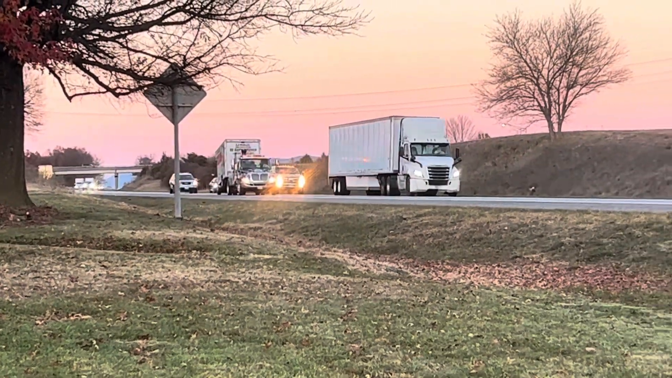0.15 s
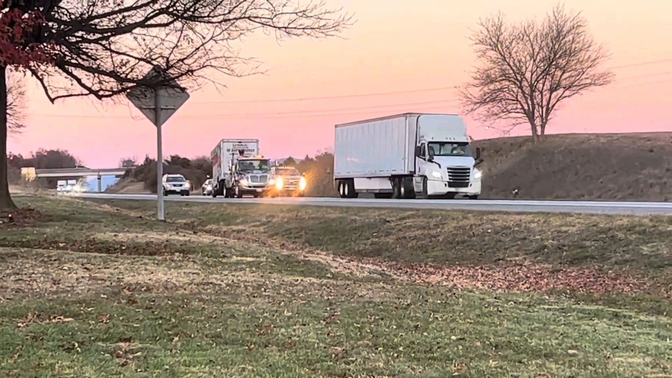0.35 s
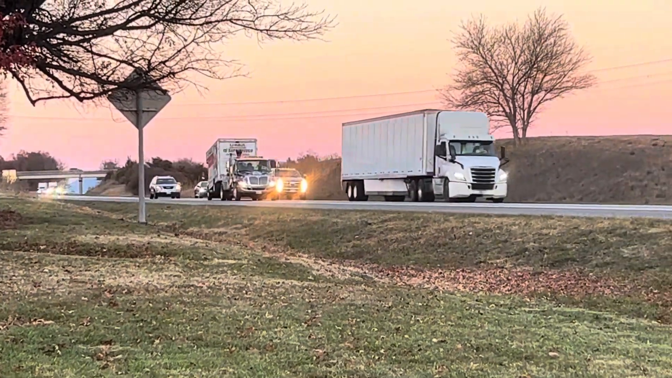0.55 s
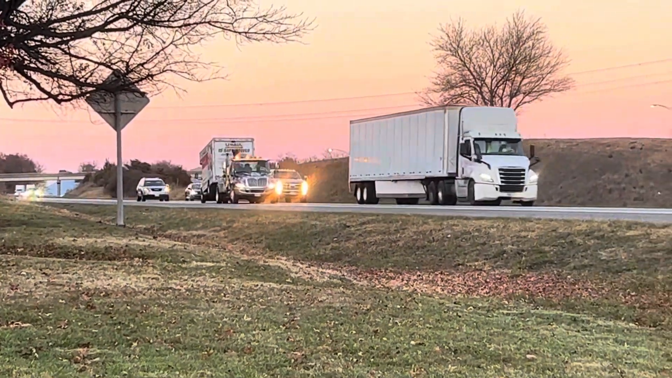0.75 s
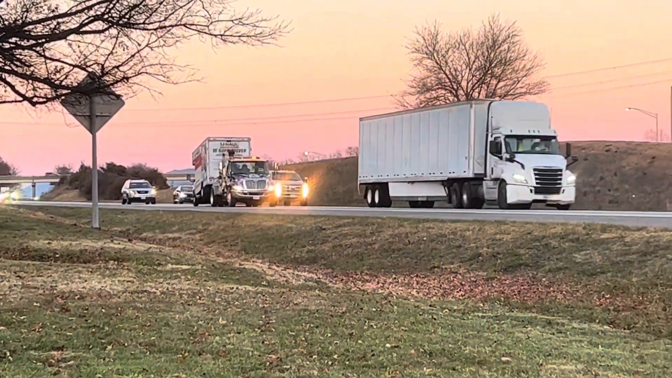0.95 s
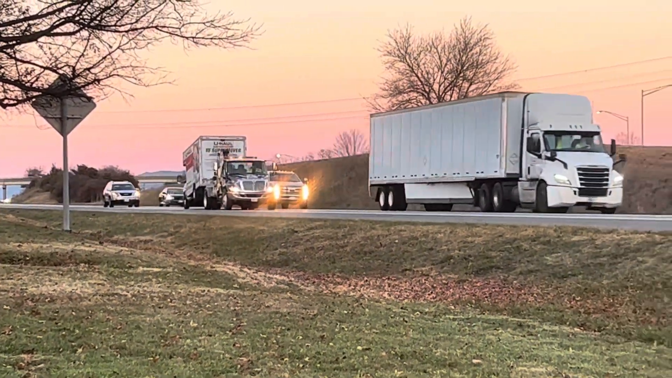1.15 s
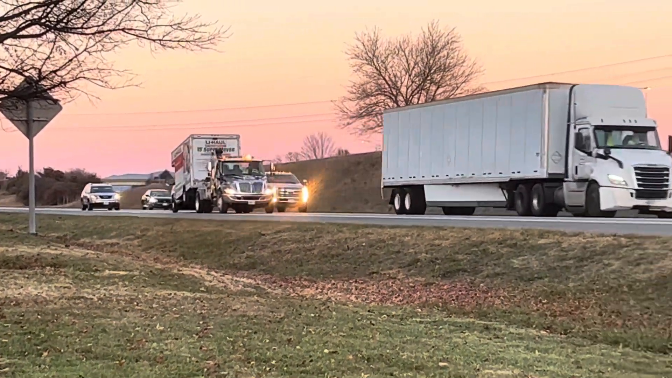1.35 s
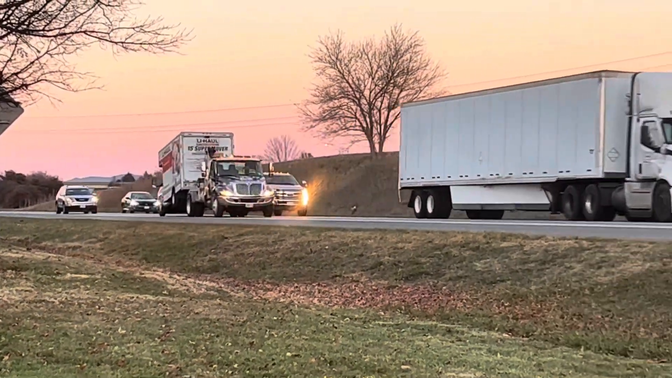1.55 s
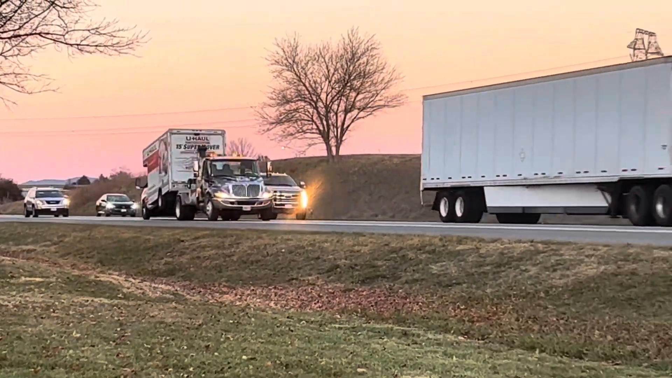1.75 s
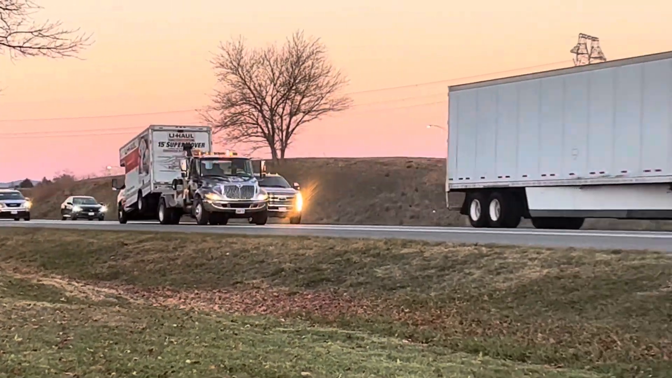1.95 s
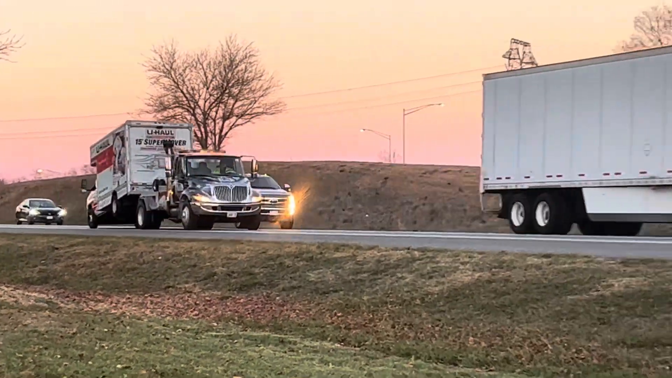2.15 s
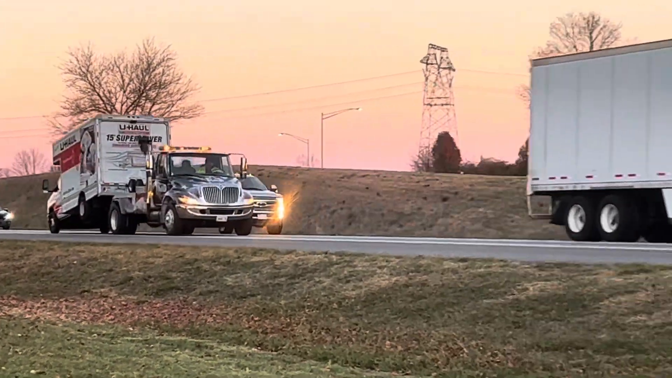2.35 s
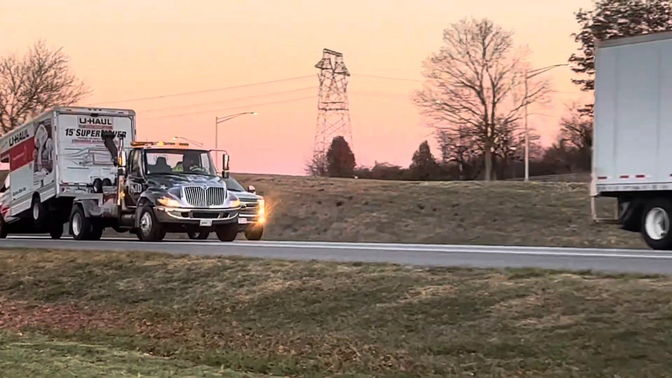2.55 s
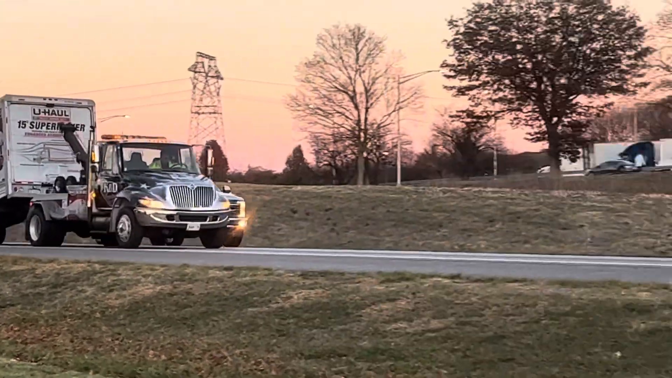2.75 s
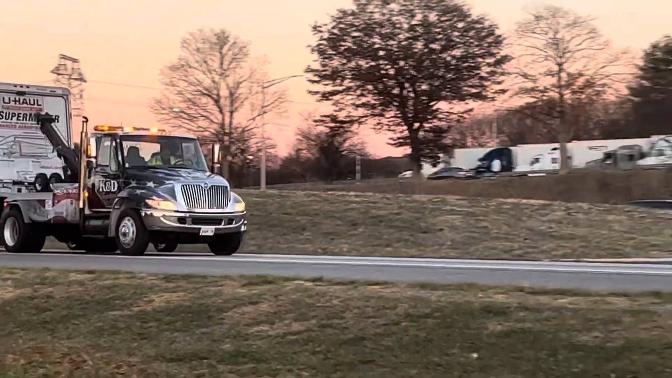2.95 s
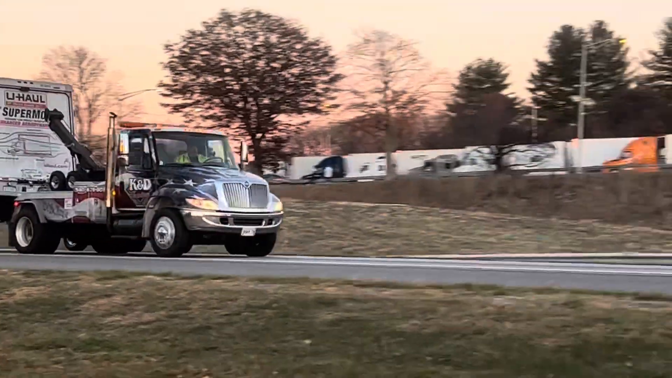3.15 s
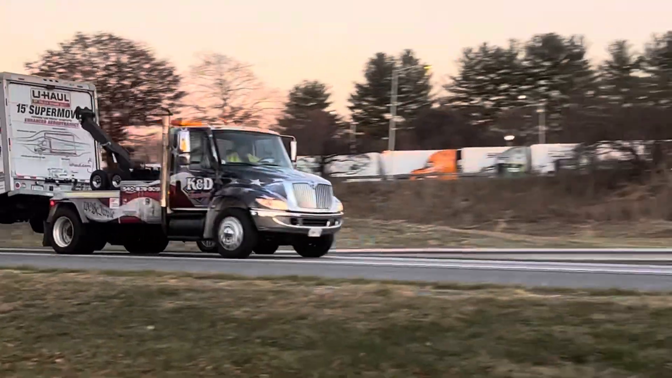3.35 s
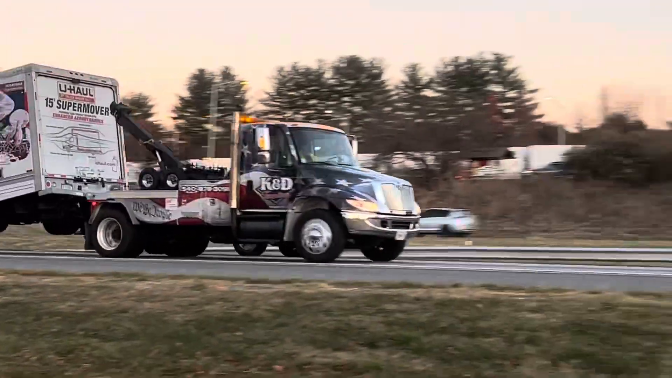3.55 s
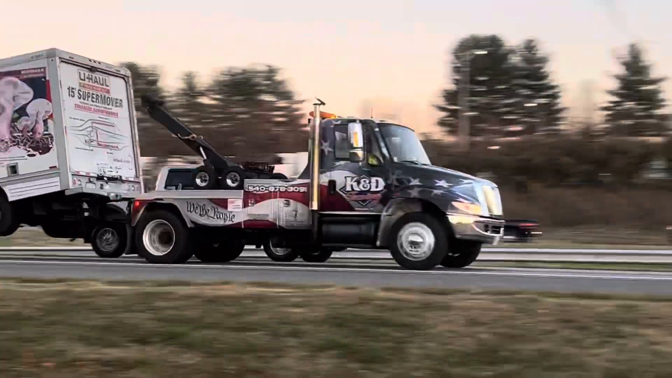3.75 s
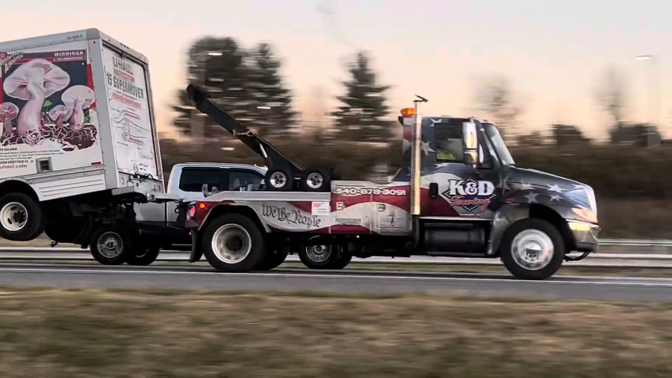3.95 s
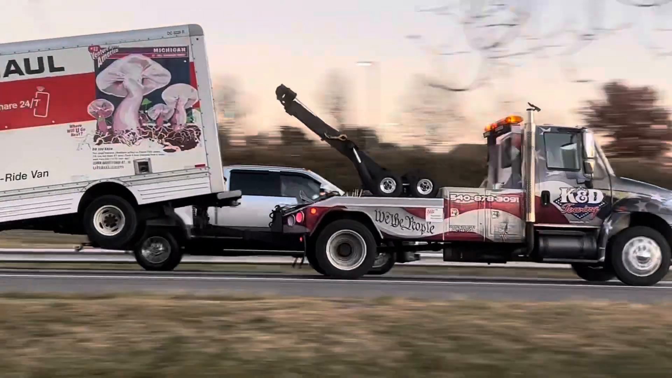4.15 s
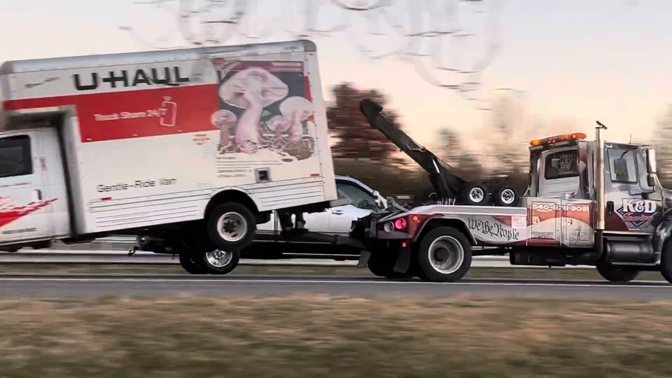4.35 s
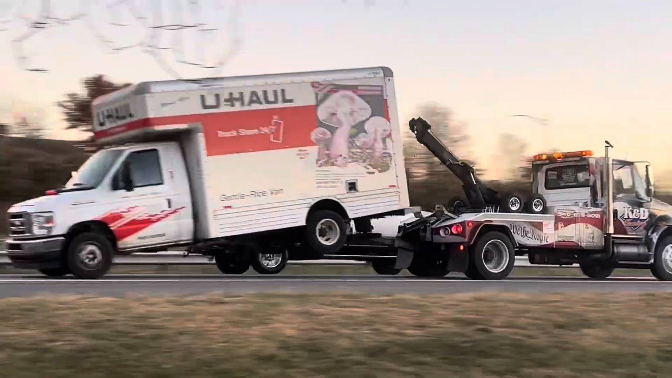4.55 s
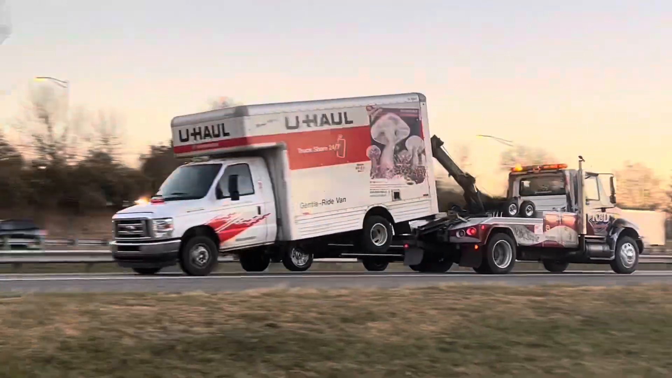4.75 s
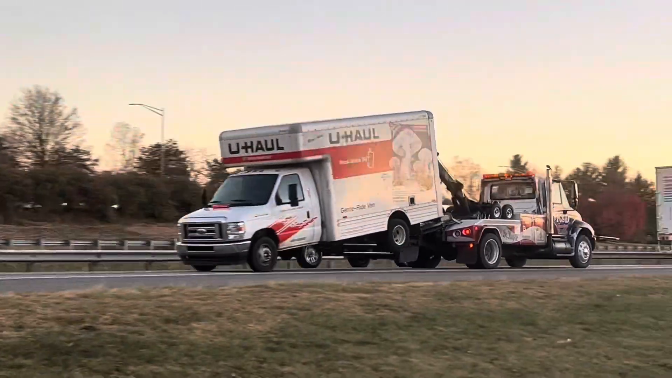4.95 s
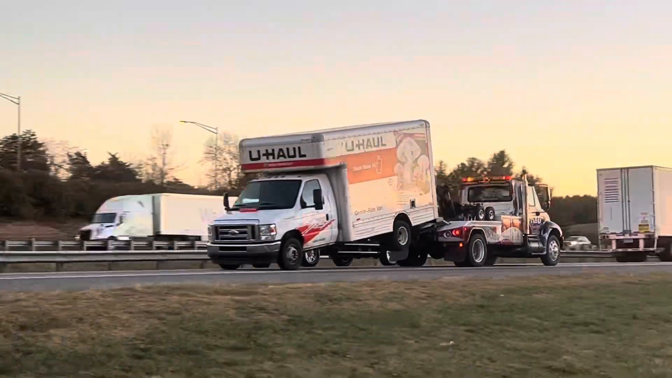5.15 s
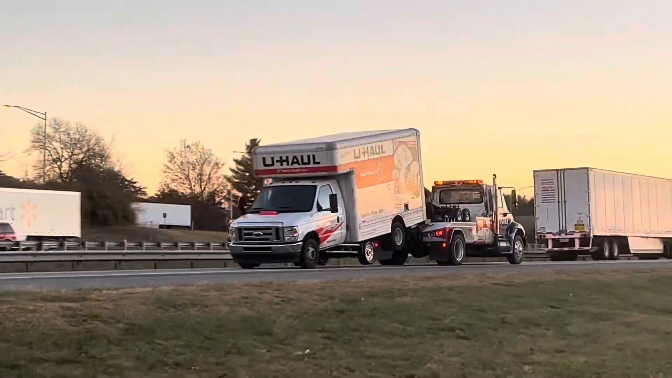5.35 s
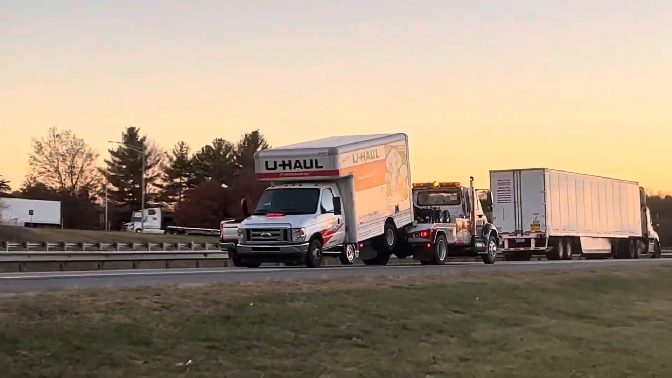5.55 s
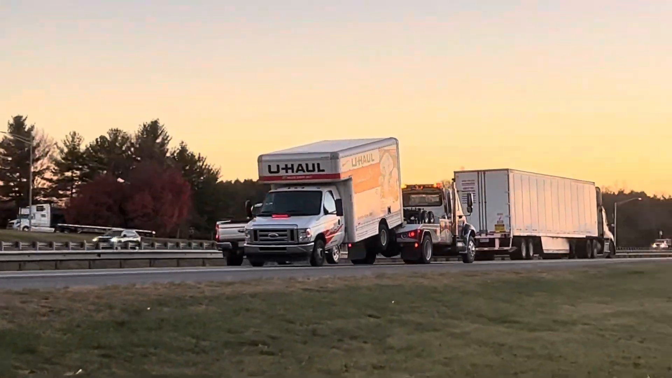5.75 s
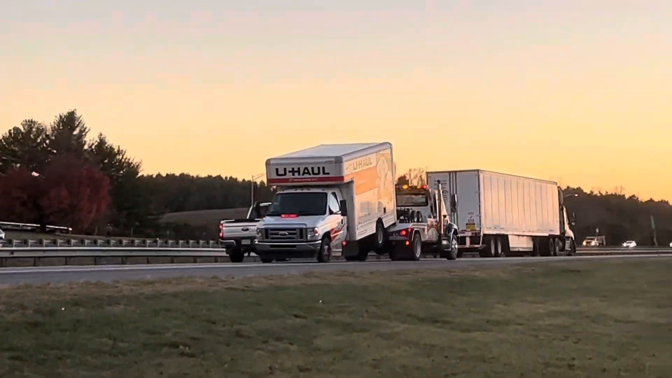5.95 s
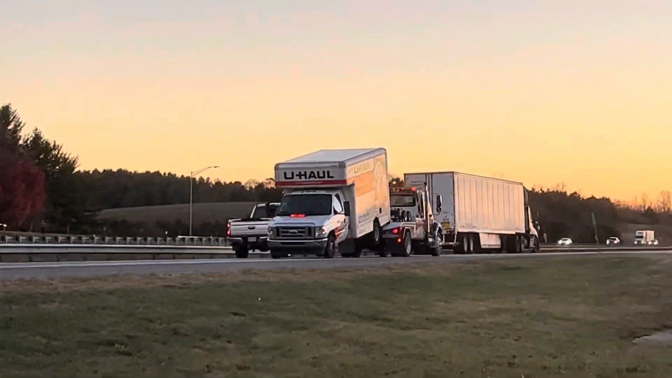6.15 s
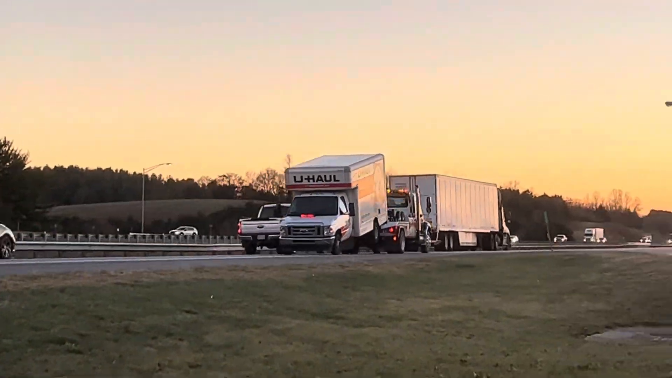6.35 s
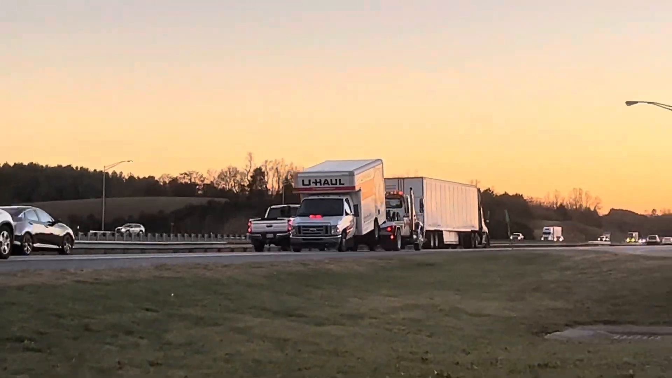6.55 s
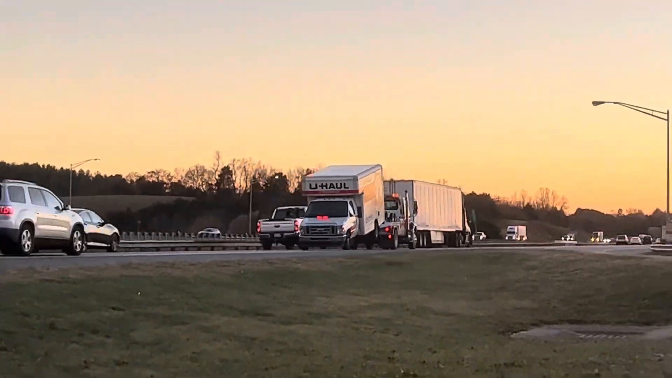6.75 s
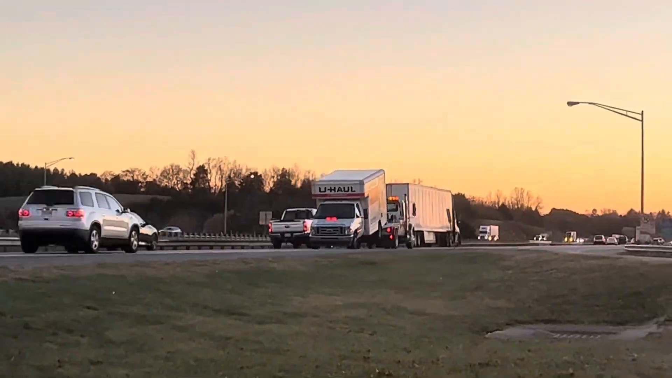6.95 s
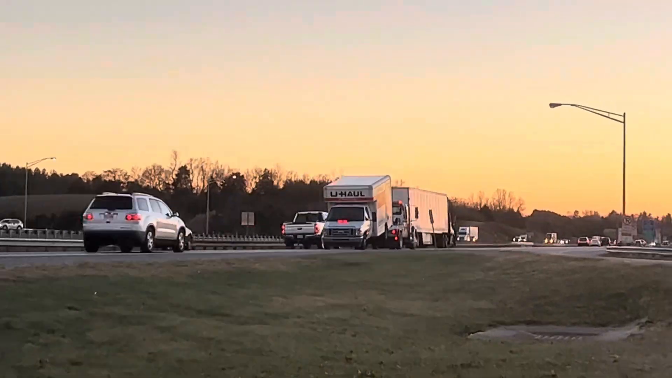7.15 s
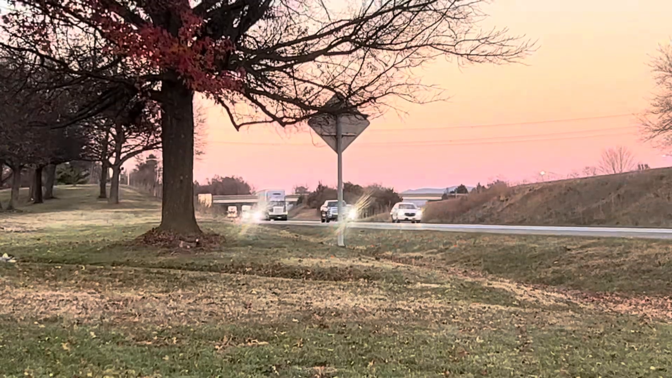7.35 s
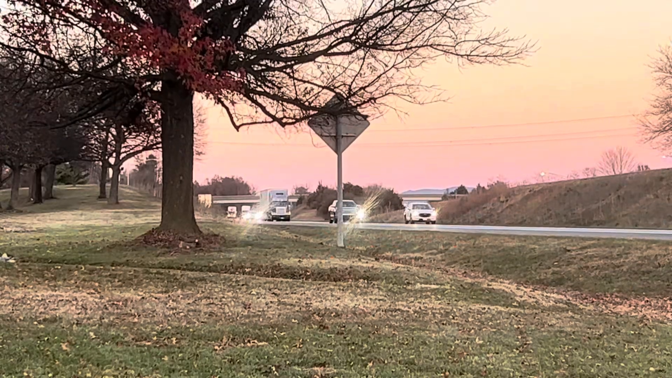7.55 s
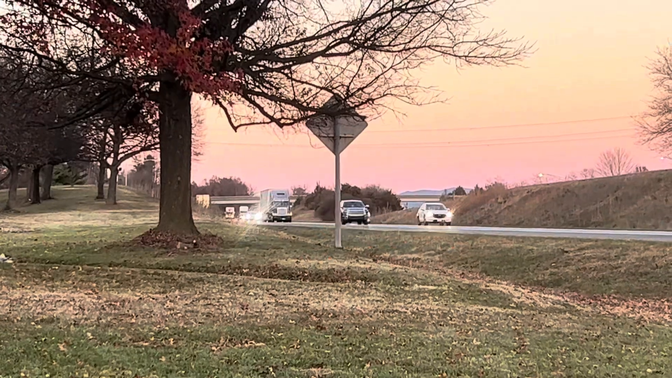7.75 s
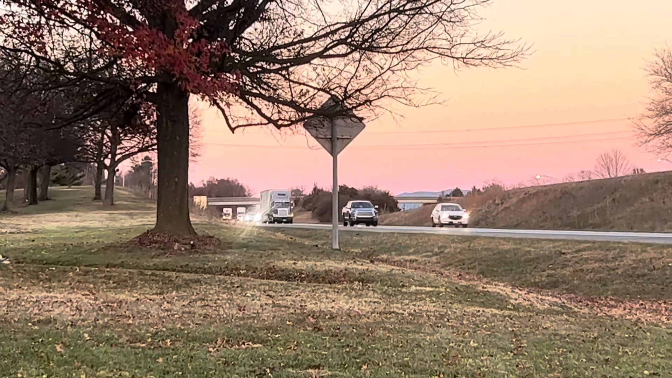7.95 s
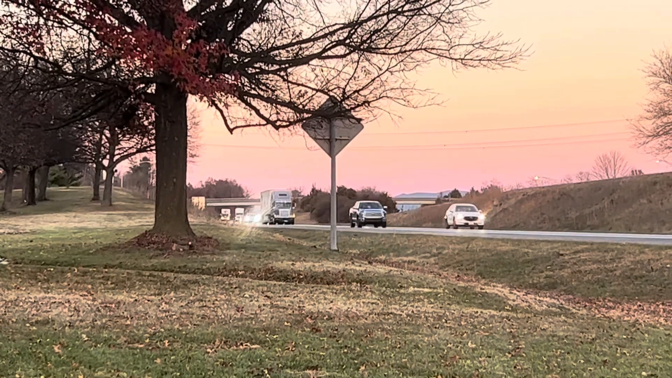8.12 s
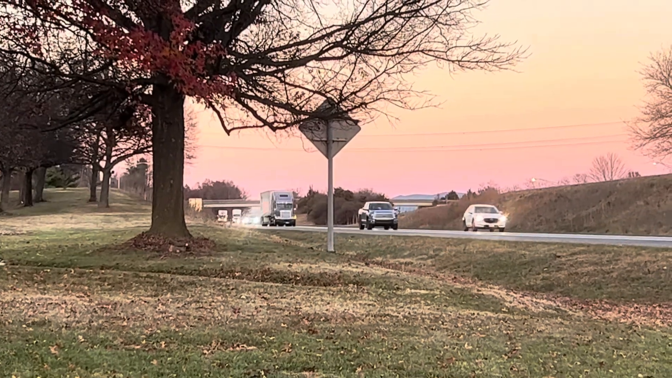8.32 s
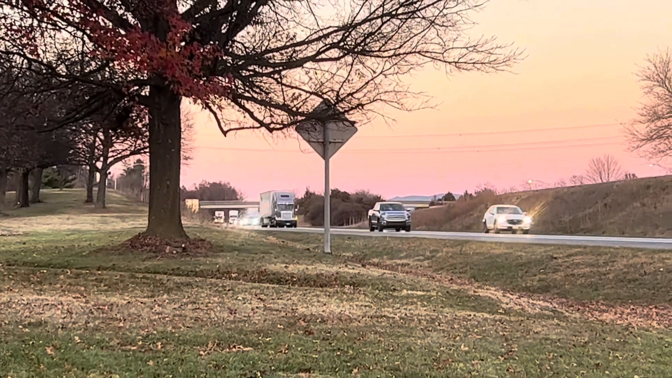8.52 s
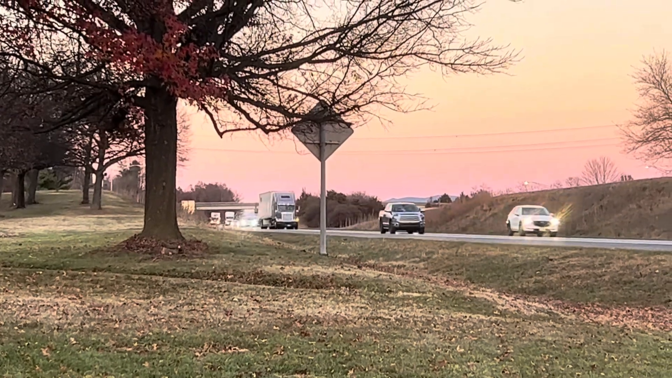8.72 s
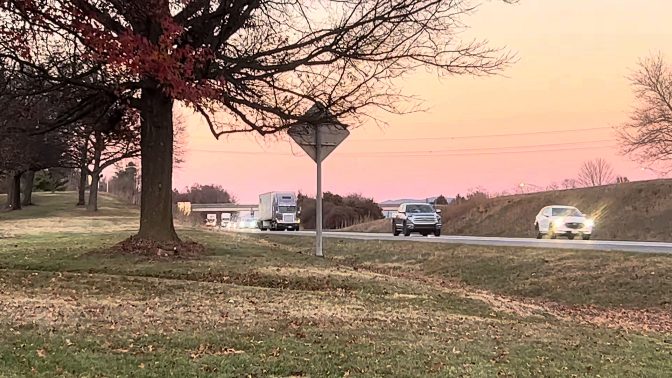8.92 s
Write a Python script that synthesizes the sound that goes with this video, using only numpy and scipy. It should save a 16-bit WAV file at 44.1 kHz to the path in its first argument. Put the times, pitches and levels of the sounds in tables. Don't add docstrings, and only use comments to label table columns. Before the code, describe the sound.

Continuous highway wash builds as a lorry approaches, its tyres humming and engine throbbing. It passes around three seconds, overlapped by a tow truck with a van in tow, brightest and loudest near four. The whines drop in pitch and the roar falls away unevenly in the moving air. Then a hard cut to softer traffic, cars still far off. Open grassy roadside, hand-held stereo pickup following the vehicles.

```python
import sys
import numpy as np
from scipy import signal
from scipy.io import wavfile
from scipy.ndimage import uniform_filter1d

SR = 44100
rng = np.random.default_rng(int(sys.argv[2]) if len(sys.argv) > 2 else 0)


def unload_wav(signal):
    wavfile.write(
        sys.argv[1],
        SR,
        np.round(np.clip(np.atleast_2d(signal).T, -1, 1) * 32767).astype(np.int16),
    )


def invert_db(level):
    return 10 ** (np.asarray(level, dtype=float) / 20)


N = 396018
SCENE_CHANGE_S = 7.2432
HOP = 512

# low edge in Hz, high edge in Hz.
LAYER_BANDS = [(30, 130), (150, 320), (480, 1300), (1500, 2600), (3000, 7000), (11500, 12800)]
LAYER_DB = [-2.5, -0.77, -2.5, -9.5, -17, -34.5]
LOSS_DB_PER_M = [.005, 0.26, 0.099, 0.058, .21, 0.51]
GUST_SHARE = [0.11, 0.035, 0.057, 1.5, 0.88, 0.34]
DISTANT_DB = [
    (-32.5, -45.5, -34.5, -37.5, -61.5, -84.5),
    (-44, -47, -39, -41, -75, -89),
]
# closest moment in seconds, distance in metres, tyres in dB,
# exhaust in dB, extra treble in dB.
VEHICLES = [
    [(2.50, 24.4, -25, -48, -3), (3.07, 19.4, -23, -24, -8), (3.91, 26.2, -20.5, -42, 0.5),
     (4.20, 18.4, -43, -28, 21), (5.58, 27.6, -26.5, -38.5, -3.5), (6.92, 38, -27.5, -47, -10)],
    [(6.54, 8.1, -32.5, -55, 9.5), (8.32, 16.5, -42, -54, 2)],
]
ROAD_SPEED = 30

# pitch in Hz, level in dB per Hz.
FAR_COLOUR = [(20, -28), (35, -5), (60, -13.5), (100, -8.5), (160, -10), (300, -16.5), (560, -17),
              (700, -9), (1000, -14.5), (1250, -12), (1560, -17), (1830, -20.5), (2400, -31), (3500, -41)]
# pitch in Hz, level in dB per Hz.
COMING_COLOUR = [(20, -34), (35, -9), (52, -11), (100, -11), (220, -20.5), (350, -18.5), (560, -13.5),
                 (800, -4.5), (1000, -7.5), (1200, -13.5), (1560, -20.5), (1830, -25.5), (2400, -33.5),
                 (3500, -40.5)]
# pitch in Hz, level in dB per Hz.
CLOSE_COLOUR = [(20, -40), (35, -1.5), (62, -8), (100, -7.5), (150, -15), (300, -11.5), (450, -10),
                (750, -2), (1000, -7), (1250, -10), (1560, -14.5), (1830, -16.5), (2400, -20.5),
                (3500, -27)]
# pitch in Hz, level in dB.
TREBLE_COLOUR = [(3500, 0), (4500, -5.5), (5900, -8.5), (7200, -12), (8600, -13.5), (9300, -14.5),
                 (10700, -13.5), (14100, -18.5), (15000, -19), (15800, -22)]
FAR_DB, CLOSE_DB = -32, -23
# time in seconds, centre in Hz, height in dB.
TREAD_RING = [
    [(0, 980, 7.5), (.9, 855, 1.5), (1.8, 780, 1), (2.5, 940, 5), (4.0, 800, 3), (5.0, 815, 0.5),
     (5.7, 884, 5), (6.6, 870, 4.5), (7.2, 1000, 4.5)],
    [(7.29, 1000, 4), (7.45, 1000, 4), (7.6, 1000, 0), (7.71, 970, 7), (7.88, 960, 5), (8.08, 990, 9),
     (8.3, 1050, 7), (8.38, 1000, 0), (8.5, 1000, 3), (8.6, 900, -5), (8.95, 900, 4)],
]
# time in seconds, change in dB, length in seconds.
GUSTS = [(.05, 1, 0.39), (.4, -0.5, 0.27), (.95, 1.5, 0.13), (1.7, -2, 0.44), (2.0, 0.5, 0.14),
         (2.512, 0, 0.53), (3.747, 1, 0.55), (4.1, -0.5, 0.4), (4.877, 1, 0.42), (5.405, -0.5, 0.99),
         (5.752, 1, 0.11), (6.2, 0.5, 0.43), (6.896, 0.5, .2), (7.306, -0.5, .1), (7.557, -1, 0.21),
         (7.75, 2, 0.17), (8.002, -0.5, 0.12), (8.25, 1, 0.34), (8.42, 1, 0.18), (8.753, -1, 0.42)]
# time in seconds, level in dB, length in seconds.
BOOM = [(.22, -29, .3), (.53, -26, 0.15), (.97, -28.5, 0.28), (1.5, -30, 0.14), (1.76, -29, 0.17),
        (2.15, -22.5, 0.24), (2.4, -29, .12), (2.62, -25, .14), (3.05, -33, .4), (3.6, -36, .55),
        (4.22, -26, 0.15), (4.42, -23.5, .15), (4.65, -30, .15), (4.92, -24, 0.13), (5.3, -22.5, .15),
        (5.8, -40, .4), (6.25, -36, .2), (6.44, -29, .14), (7.0, -32, 0.34), (7.28, -39, 0.16),
        (7.58, -35, 0.1), (7.98, -41, 0.14), (8.15, -47, .1), (8.5, -41, .2), (8.82, -39, .25)]
BOOM_IN_RUMBLE_DB = -9.5
SWELL_EDGE = 2.8

# time in seconds, left lead in ms,
# left over right in dB near 1 kHz.
BEARING = [
    [(0, -0.32, -6), (1.5, -0.018, -0.5), (2.25, 0.023, -1), (3.2, -0.28, 0.5), (3.8, -0.045, 1.5),
     (4.7, -0.04, -2.5), (5.2, 0.089, -1.5), (6.0, 0.1, 2.5), (7.24, -0.04, 1)],
    [(7.25, -0.24, -0.5), (8.2, -0.34, -2), (8.98, -0.33, -1.5)],
]
# pitch in Hz, turn in radians.
DUCT = [(6700, 0), (16000, -9.6)]
# pitch in Hz, likeness from 0 to 1.
LIKENESS = [(60, .99), (150, 0.96), (260, 0.95), (500, 0.75), (780, 0.65), (950, 0.78), (1200, 0.046),
            (1450, 0.059), (1800, 0.63), (2200, 0.95), (2700, 0.94), (7000, 1), (8200, 0.91), (15000, 0.8)]
# pitch in Hz, left over right in dB.
LEAN = [(200, 0), (300, -.3), (550, .8), (950, .8), (1200, 0), (1450, -2.5), (1800, -3.8), (2250, -1.5),
        (2800, 0)]
CASE_RING_HZ, CASE_RING_WIDTH, CASE_RING_DB = 1814, 0.083, 2.7
# pitch in Hz, share in dB.
SIDE_KEEP = [(1900, -40), (2200, -15), (3000, -9), (7500, -5), (8200, -3), (11000, -4), (12000, -3),
             (15000, -3)]
MID_KEEP_DB = -9
# pitch in Hz, share in dB.
LINE_KEEP = [(4000, -20), (7000, -10), (9000, -7), (12000, -4), (14000, -5), (15000, -6)]
QUIET_RAISES = .12

# closest moment in seconds, distance in metres, speed in m/s.
AT_REST = (0, 1, 0)
TOW_REAR, TOW_FRONT = (4.10, 21.6, 29.7), (4.04, 15.2, 27.9)
LORRY, LORRY_FRONT, LORRY_ENGINE = (3.06, 23.4, 31.7), (2.92, 23.3, 35.4), (2.99, 23.5, 30.7)

# time in seconds, level in dB, left lead in ms.
PICKUP_WHINE = [(3.15, -50, 0), (3.3, -36, 0), (3.5, -27.5, 0), (3.62, -32, 0), (3.76, -27, 0),
                (3.9, -35, 0), (4.0, -33, 0), (4.2, -32, 0), (4.4, -29.5, 0), (4.6, -45, 0)]
# time in seconds, level in dB, left lead in ms.
VAN_WHINE = [
    (4.3, -48, 0),
    (4.55, -41, 0),
    (4.8, -39, 0),
    (5.0, -36, 0),
    (5.2, -51, 0),
]
# time in seconds, level in dB, left lead in ms.
JOINT_HUM = [(3.5, -45, 0), (3.6, -32, 0), (3.7, -28, 0), (3.8, -35, 0), (3.87, -45, 0), (4.0, -40, 0),
             (4.2, -35, 0), (4.3, -42, 0), (4.45, -35, 0), (4.7, -38, 0), (4.8, -50, 0)]
# time in seconds, level in dB.
VAN_RING = [
    (4.2, -50),
    (4.55, -35.5),
    (5.1, -35.5),
    (5.5, -44),
    (6.2, -52),
]
# time in seconds, level in dB, length in seconds.
TOW_WHINE = [(3.15, -33.5, .3), (3.4, -26.5, 0.16), (3.75, -25, 0.22), (4.1, -24.5, 0.17),
             (4.52, -24.5, 0.47), (4.95, -35.5, 0.26), (5.3, -41, 0.52), (5.65, -40.5, .3),
             (5.93, -37.5, .2), (6.2, -39, 0.17), (6.42, -44, .35)]
TOW_LEAD_MS = 0.051
# time in seconds, level in dB, length in seconds.
TOW_NOTE = [
    (4.5, -35.5, .25),
    (5.1, -37, .3),
    (5.6, -40.5, 0.46),
    (6.0, -42, .3),
]
# time in seconds, level in dB.
TURBO = [(3.1, -80), (3.35, -63), (3.6, -58), (4.2, -57), (4.8, -60), (5.15, -65), (5.5, -77)]

# time in seconds, level in dB, length in seconds.
LORRY_WHINE = [(1.15, -45, .3), (1.5, -38.5, 0.5), (1.85, -34.5, 0.61), (2.2, -23.5, 0.3),
               (2.45, -33.5, 0.22), (2.7, -22.5, .34), (2.98, -28, 0.41), (3.4, -37, .25),
               (3.7, -28.5, 0.13), (3.9, -32, 0.23), (4.25, -32.5, 0.46), (4.5, -30.5, 0.17),
               (4.75, -34.5, 0.26), (5.0, -39, 0.22), (5.28, -36, .28), (5.65, -39, 0.17), (6.1, -51, .9),
               (6.75, -47, 0.34), (7.0, -42.5, 0.58)]
# time in seconds, level in dB, length in seconds.
LORRY_LUGS = [(.5, -51, .5), (1.15, -46, .5), (1.65, -37, .35), (1.92, -32, .3), (2.15, -37, .2),
              (2.65, -42, .5), (3.05, -29.5, .22), (3.28, -28.5, .42)]
# time in seconds, level in dB, length in seconds.
AXLE_LUGS = [
    (1.1, -45, 0.33),
    (1.55, -41, 0.33),
    (2.05, -41, .35),
    (2.5, -38, .2),
]
# time in seconds, lead in ms.
LORRY_LEAD = [(0, 0.098), (1.9, -0.00048), (2.4, -0.017), (3.0, -0.35), (3.5, -0.17), (4.0, -0.46),
              (4.5, 0.045), (5.5, 0.095), (7.2, 0.2)]
LUGS_AHEAD_S = 0.3
# time in seconds, level in dB, length in seconds.
FIRING = [(.08, -34.5, 0.22), (.75, -37, 0.33), (1.2, -33, 0.27), (1.5, -36.5, 0.3), (1.95, -33, .3),
          (2.45, -30.5, 0.46), (2.75, -27, .25), (3.1, -31, 0.18), (3.55, -28, 0.26), (3.9, -33, .2),
          (4.25, -31, 0.23)]
# time in seconds, level in dB, length in seconds.
FAR_DRONE = [(.22, -36, 0.27), (.55, -41, 0.43), (.88, -35.5, .2), (1.3, -37, 0.21), (1.75, -36, 0.36)]
# time in seconds, level in dB, length in seconds.
STACK_HUM = [
    (1.97, -35, .2),
    (3.55, -36, .25),
]
# time in seconds, level in dB.
GROOVE_RING = [(.5, -37.5), (1.2, -47), (2.0, -33.5), (2.6, -29), (3.2, -30.5), (3.6, -30), (4.0, -46)]
# time in seconds, level in dB.
FAN_HISS = [(.6, -78), (1.0, -65), (1.6, -61), (2.2, -57), (2.7, -53), (3.0, -55), (3.3, -79)]
# time in seconds, level in dB, length in seconds.
TRAILER_DRUM = [
    (2.55, -30, 0.51),
    (3.1, -31.5, 0.99),
    (3.95, -33, 0.46),
]


def in_time(rows, t):
    s, *columns = np.transpose(rows)
    return [np.interp(t, s, column) for column in columns]


def at_hz(points, hz):
    table_hz, value = np.transpose(points)
    return np.interp(np.log(hz + 1), np.log(table_hz), value)


def bump(hz, centre_hz, width):
    return np.exp(-(np.log((hz + 1) / centre_hz) / width) ** 2)


def drift(shape, rate_hz, step_s):
    r = np.exp(-2 * np.pi * rate_hz * step_s)
    slow = signal.lfilter([1], [1, -2 * r, r * r], rng.standard_normal(shape))
    return slow / slow.std()


def swells(rows, t):
    s, db, length = np.transpose(rows)[:, :, None]
    each_db = db - 6 * abs(2 * (t - s) / length) ** SWELL_EDGE
    return 10 * np.log10((invert_db(each_db) ** 2).sum(0) + 1e-9)


def swelling(rows, lead=((0, 0),), ahead_s=0):
    t = np.arange(rows[0][0] - rows[0][2], rows[-1][0] + rows[-1][2], .01)
    return np.transpose([t, swells(rows, t), *in_time(lead, t + ahead_s)])


def gusts(t):
    s, db, length = np.transpose(GUSTS)[:, :, None]
    return (db * np.exp(-abs(2 * (t - s) / length) ** SWELL_EDGE)).sum(0)


def layer_levels(shot, t):
    power = np.outer(invert_db(DISTANT_DB[shot]) ** 2, np.ones(len(t)))
    power[0] += invert_db(swells(BOOM, t) + BOOM_IN_RUMBLE_DB) ** 2
    for closest_s, metres, tyre_db, exhaust_db, lift_db in VEHICLES[shot]:
        away = np.hypot(ROAD_SPEED * (closest_s - t), metres)
        source_db = np.array([tyre_db - 6.5, exhaust_db, tyre_db, tyre_db,
                              tyre_db + lift_db / 2, tyre_db + lift_db]) + LAYER_DB
        loss_db = np.outer(LOSS_DB_PER_M, away - metres)
        power += (invert_db(source_db[:, None] - loss_db) * metres / away) ** 2
    return 10 * np.log10(power) + np.outer(GUST_SHARE, gusts(t))


def road_colour(shot, far, tread_width, hz, t):
    levels = layer_levels(shot, t)
    near = np.clip((levels[2] - FAR_DB) / (CLOSE_DB - FAR_DB), 0, 1)
    colour = np.outer(at_hz(far, hz), 1 - near) + np.outer(at_hz(CLOSE_COLOUR, hz), near)
    case_ring = CASE_RING_DB * bump(hz, CASE_RING_HZ, CASE_RING_WIDTH)
    colour += (at_hz(TREBLE_COLOUR, hz) + case_ring)[:, None]
    centre, height_db = in_time(TREAD_RING[shot], t)
    colour += height_db * bump(hz[:, None], centre, tread_width)
    held = []
    for low, high in LAYER_BANDS:
        power = (invert_db(colour[(hz > low) & (hz < high)]) ** 2).sum(0)
        held.append(10 * np.log10(2 / (4 * HOP) * power))
    layer = np.arange(len(LAYER_BANDS))
    middle_hz = np.sqrt(np.prod(LAYER_BANDS, axis=1))
    place = np.interp(np.log(hz + 1), np.log(middle_hz), layer)
    blend = np.clip(1 - abs(place[:, None] - layer), 0, 1)
    return colour + blend @ (levels - held)


def turbulence(hz, t):
    shape, step_s = (30, len(t)), HOP / SR
    own = drift(shape, 22.0, step_s)
    shared = uniform_filter1d(drift(shape, 23.0, step_s), size=7, axis=0) * np.sqrt(7)
    slow = uniform_filter1d(drift(shape, 9.3, step_s), size=3, axis=0) * np.sqrt(3)
    band = np.interp(np.log(hz + 1), np.log([40, 16000]), [0, 29]).round().astype(int)
    strength = np.clip(np.log(hz + 1) / np.log(8000), 0, 1)[:, None] ** 3
    return (.6 * shared + .7 * own + .6 * slow)[band] * strength


def duct(hz):
    return np.exp(.5j * np.interp(hz, *np.transpose(DUCT)))


def at_ports(shot, common, apart, hz, t):
    alike = np.clip(at_hz(LIKENESS, hz), 0, 1)[:, None]
    lead_ms, pan_db = in_time(BEARING[shot], t)
    lag = np.exp(1j * np.pi * np.outer(hz * (hz < 1500), lead_ms) / 1000)
    turn = duct(hz)[:, None] * lag
    tilt = invert_db((at_hz(LEAN, hz)[:, None] + np.outer(bump(hz, 1050, 0.66), pan_db)) / 2)
    mid = np.sqrt((1 + alike) / 2) * common
    side = np.sqrt((1 - alike) / 2) * apart
    return np.array([(mid + side) * turn * tilt, (mid - side) / turn / tilt])


def traffic(shot, far, tread_width):
    noise = rng.standard_normal((2, N), dtype=np.float32)
    hz, t, (common, apart) = signal.stft(noise, SR, nperseg=4 * HOP, noverlap=3 * HOP)
    colour = road_colour(shot, far, tread_width, hz, t) + turbulence(hz, t)
    heard = invert_db(colour) * at_ports(shot, common, apart, hz, t)
    return signal.istft(heard, SR, nperseg=4 * HOP, noverlap=3 * HOP)[1][:, :N]


def doppler(passing, t):
    closest_s, metres, speed = passing
    ahead = speed * (closest_s - t)
    return 1 / (1 - speed / 343 * ahead / np.hypot(ahead, metres))


def tone(rows, rest_hz, passing, rough, width_hz, octave_db=-60):
    t = np.arange(N) / SR
    start, end = rows[0][0], rows[-1][0]
    fade = np.interp(t, [start - .1, start, end, end + .1], [0, 1, 1, 0])
    live = fade > 0
    real, imaginary = drift((2, N // 8 + 1), width_hz, 8 / SR)
    wobble = np.interp(t[live], t[::8], (real + 1j * imaginary)[:len(t[::8])])
    level_db, *lead_ms = in_time(rows, t[live])
    hz = rest_hz * doppler(passing, t[live])
    turn = duct(hz) * np.exp(1j * np.pi * hz * sum(lead_ms) / 1000)
    cycle = np.exp(2j * np.pi * np.cumsum(hz) / SR) * np.array([turn, 1 / turn])
    body = np.sqrt(2 - 2 * rough) + np.sqrt(rough) * wobble
    out = np.zeros((2, N))
    out[:, live] = invert_db(level_db) * fade[live] * (body * (cycle + invert_db(octave_db) * cycle ** 2)).real
    return out


def engine_boom(hz, width_hz):
    return tone(swelling(BOOM), hz, AT_REST, rough=.15, width_hz=width_hz)


def pickup():
    return tone(PICKUP_WHINE, 365, TOW_REAR, rough=.1, width_hz=6.9)


def towed_van():
    whine = tone(VAN_WHINE, 400, TOW_REAR, rough=0.19, width_hz=4.5)
    grooves = tone(VAN_RING, 1880, TOW_REAR, rough=1, width_hz=130.0)
    joints = tone(JOINT_HUM, 468, TOW_REAR, rough=.15, width_hz=8.0, octave_db=-4)
    return whine + grooves + joints


def tow_truck():
    whine = tone(swelling(TOW_WHINE, [(0, TOW_LEAD_MS)]), 383.9, TOW_REAR,
                 rough=.1, width_hz=8.0, octave_db=-14)
    whistle = tone(TURBO, 13880, TOW_FRONT, rough=.8, width_hz=85.0)
    exhaust = tone(swelling(TOW_NOTE), 177, TOW_REAR, rough=.2, width_hz=5.0)
    return whine + whistle + exhaust


def lorry_tyres():
    whine = tone(swelling(LORRY_WHINE, LORRY_LEAD), 367.5, LORRY, rough=.05, width_hz=8.0, octave_db=-11)
    lugs = tone(swelling(LORRY_LUGS, LORRY_LEAD, LUGS_AHEAD_S), 622, LORRY_FRONT, rough=.2, width_hz=16.0)
    lugs += tone(swelling(AXLE_LUGS), 594, LORRY_FRONT, rough=.5, width_hz=14.0)
    grooves = tone(GROOVE_RING, 1250, LORRY, rough=1, width_hz=190.0)
    return whine + lugs + grooves


def lorry_body():
    firing = tone(swelling(FIRING), 71.3, LORRY_ENGINE, rough=.05, width_hz=6.0)
    drone = tone(swelling(FAR_DRONE), 113, AT_REST, rough=.2, width_hz=6.0)
    stack = tone(swelling(STACK_HUM), 198, AT_REST, rough=.2, width_hz=6.0)
    fan = tone(FAN_HISS, 6700, LORRY, rough=1, width_hz=380.0)
    drum = tone(swelling(TRAILER_DRUM), 103, LORRY, rough=1, width_hz=14.0)
    return firing + drone + stack + fan + drum


def scene():
    t = np.arange(N) / SR
    passing = traffic(0, FAR_COLOUR, tread_width=.11)
    passing += invert_db(-3) * engine_boom(60, width_hz=6.0)
    passing += pickup() + towed_van() + tow_truck() + lorry_tyres() + lorry_body()
    coming = traffic(1, COMING_COLOUR, tread_width=.07)
    coming += invert_db(-2) * engine_boom(58, width_hz=5.0)
    after = np.clip((t - SCENE_CHANGE_S) / .00007 + .5, 0, 1)
    return (passing * (1 - after) + coming * after) * np.clip(t / .003, 0, 1)


def joint_stereo(x):
    hz, t, (mid, side) = signal.stft([x[0] + x[1], x[0] - x[1]], SR, nperseg=4 * HOP, noverlap=2 * HOP)
    band = np.round(np.log(hz + 1) * 24).astype(int)
    member = band == np.unique(band)[:, None]
    mid_power, side_power = member @ abs(mid) ** 2, member @ abs(side) ** 2
    side_db = 10 * np.log10(member.T @ ((side_power + 1e-20) / (mid_power + 1e-20)))
    side = side * (side_db > at_hz(SIDE_KEEP, hz)[:, None])
    mid = mid * ((side_db < -MID_KEEP_DB) | (hz < 7000)[:, None])
    power = member @ (abs(mid) ** 2 + abs(side) ** 2) / member.sum(1)[:, None]
    band_db = 10 * np.log10(member.T @ power + 1e-20)
    quiet_db = np.median(band_db, axis=1)[:, None] - band_db
    floor_db = band_db + at_hz(LINE_KEEP, hz)[:, None] + QUIET_RAISES * quiet_db
    floor = invert_db(floor_db) * (hz > 4000)[:, None]
    mid, side = mid * (abs(mid) > floor), side * (abs(side) > floor)
    left_right = np.array([mid + side, mid - side]) / 2
    return signal.istft(left_right, SR, nperseg=4 * HOP, noverlap=2 * HOP)[1][:, :N]


def band_limit(x):
    return signal.sosfilt(signal.butter(12, 15430, fs=SR, output="sos"), x)


def record(dry):
    bass_cut = signal.butter(3, 38.0, "high", fs=SR, output="sos")
    mix = joint_stereo(signal.sosfilt(bass_cut, dry))
    return band_limit(mix)


dry = scene()
out = record(dry)
unload_wav(out)
```